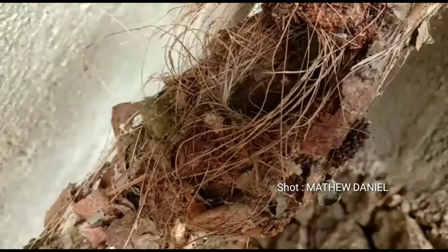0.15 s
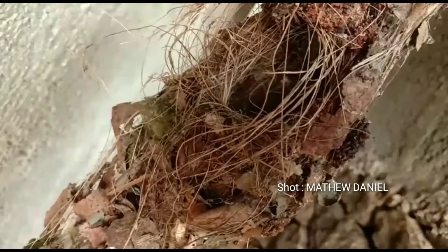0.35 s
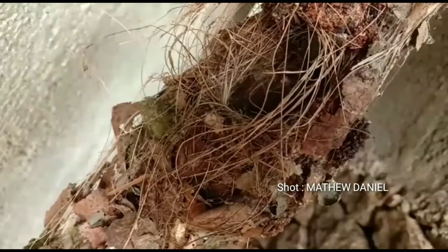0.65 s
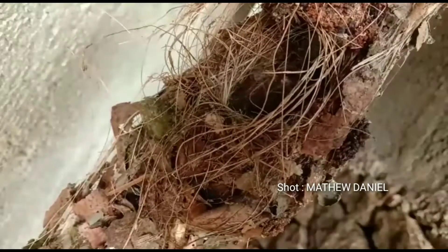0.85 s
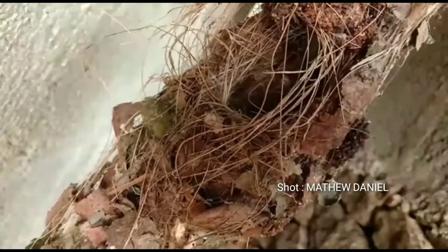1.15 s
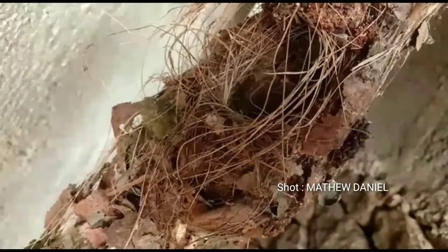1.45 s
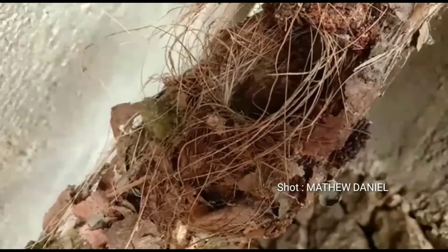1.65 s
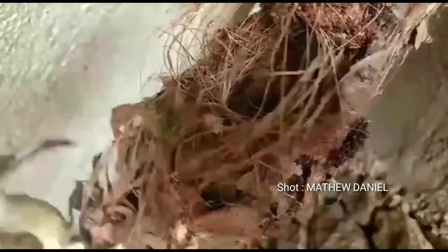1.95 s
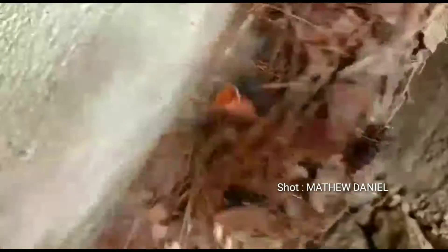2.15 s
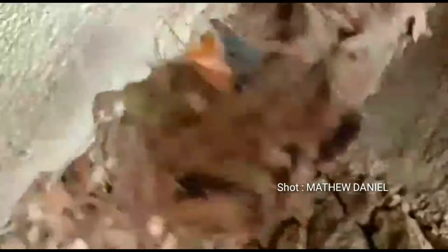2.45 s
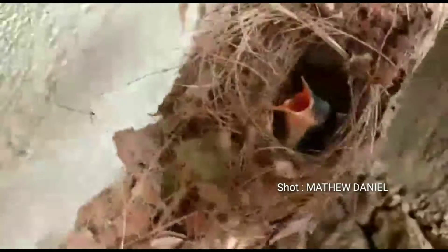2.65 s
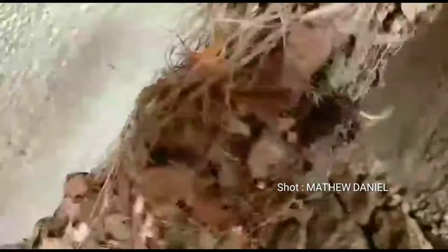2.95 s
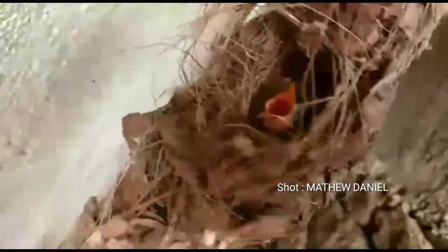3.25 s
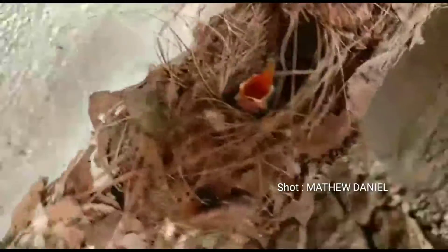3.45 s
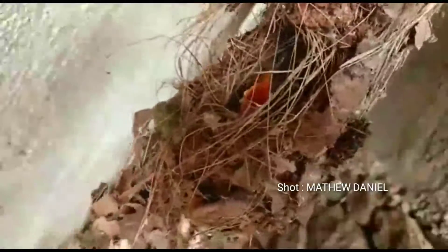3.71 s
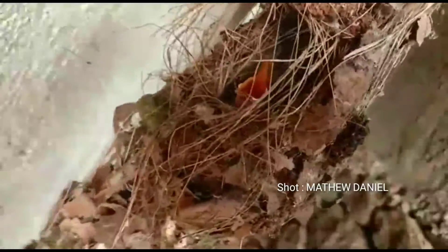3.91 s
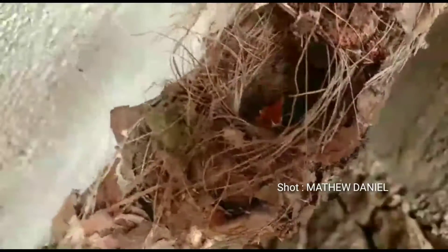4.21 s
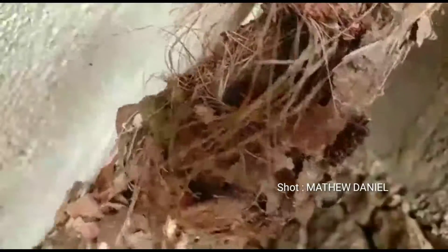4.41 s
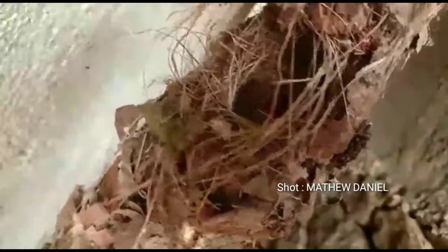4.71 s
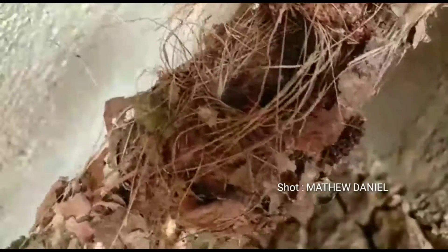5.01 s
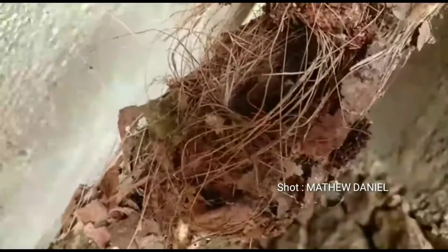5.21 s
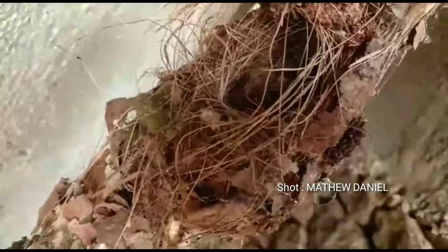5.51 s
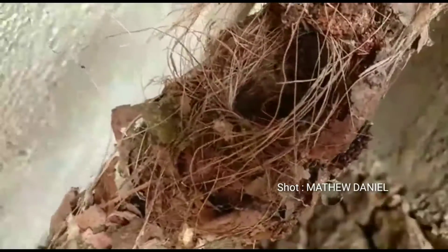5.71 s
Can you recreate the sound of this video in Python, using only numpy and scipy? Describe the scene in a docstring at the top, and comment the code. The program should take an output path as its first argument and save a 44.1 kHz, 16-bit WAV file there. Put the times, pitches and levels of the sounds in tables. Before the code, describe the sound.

A small bird's low fluttering thumps and feathery swishes surround piercing chick peeps, a sharp rasping call, a brief buzz and faraway cawing.

```python
"""Under the eaves, a sunbird flutters about its nest close to the microphone while a chick begs in thin peeps.
Wing beats are smooth puffs with swirling air and grainy feather noise; the peeps are nearly pure gliding tones.
The parent gives one harsh chak, a rising tone mixed with rasp, and a few falling chips with a wall echo.
On the left, small birds whistle, a fast pulse train buzzes and tiny upward slurs make a trill; lisps sound ahead.
Farther off a crow caws twice in a hoarse harmonic voice, amid low calls, faint ticks and quiet coloured-noise air."""
import sys
import numpy as np
from scipy import signal
from scipy.fft import rfft, irfft, next_fast_len
from scipy.io import wavfile

SR = 44100
rng = np.random.default_rng(int(sys.argv[2]) if len(sys.argv) > 2 else 0)


def log_audio(samples):
    """Write samples as a 16-bit WAV file to the path given in sys.argv[1]."""
    # one column per channel
    frames = np.atleast_2d(samples).T
    # limit to full scale, then quantise
    limited = np.clip(frames, -1, 1)
    pcm = np.round(limited * 32767).astype(np.int16)
    wavfile.write(sys.argv[1], SR, pcm)


N = 258867
T = np.arange(N) / SR   # time of every sample, in seconds

# Flurries of wing beats. Each row: start in seconds, length in seconds, thump level in dB,
# level of the swirling air in dB, feather swish in dB (before the swish is lifted as a whole).
FLURRIES = [(0.013, 0.091, -34, -47, -50), (0.11, 0.059, -32, -40.5, -45), (0.181, 0.11, -33, -46.5, -48),
            (.325, 0.049, -32, -37, -49), (0.386, 0.059, -28.5, -47, -47.5), (0.473, .052, -25, -37, -46.5),
            (0.547, .11, -32, -46, -51.5), (0.694, 0.031, -39, -54, -49.5), (0.768, 0.031, -36, -50, -47),
            (0.813, 0.078, -26, -36.5, -45.5), (0.948, 0.059, -28, -43, -47.5), (1.03, 0.2, -44, -55, -53),
            (1.267, 0.061, -42, -58, -49), (1.368, 0.061, -32.5, -41, -47.5),
            (1.489, .064, -32, -48.5, -48.5), (1.632, .045, -30, -39.5, -44),
            (1.692, 0.07, -39, -42.5, -49), (1.767, 0.071, -32, -35, -44.5), (1.89, 0.073, -67, -73, -51),
            (2.15, .146, -30, -30, -38), (2.32, 0.061, -32.5, -46, -53), (4.198, 0.069, -51, -47, -61),
            (4.744, 0.19, -43, -43.5, -51), (5.066, 0.059, -29, -37.5, -48),
            (5.151, 0.066, -44, -55, -50.5), (5.213, 0.076, -31, -42, -48.5),
            (5.318, .18, -34.5, -53, -51.5), (5.513, .1, -34.5, -44, -51.5),
            (5.645, 0.06, -34.5, -41.5, -48.5), (5.769, 0.071, -32.5, -39.5, -48.5)]
# The parent's high falling chips. Each row: start in seconds, level in dB (before flutter and wall echo).
CHIPS = [(4.999, -27), (5.368, -29.5), (5.618, -29.5)]


def from_db(db):
    """Turn decibels into a gain."""
    return 10 ** (np.asarray(db) / 20)


def rms_one(x):
    """Scale a sound to unit power."""
    return x / np.sqrt(np.mean(x ** 2) + 1e-20)


def colour(x, spectrum):
    """Filter a sound by an outline of (Hz, dB) points that falls steeply past its ends."""
    hz, db = np.transpose(spectrum)
    size = next_fast_len(N, real=True)
    f = np.maximum(np.arange(size // 2 + 1) * SR / size, 1)
    outline = from_db(np.interp(np.log(f), np.log(hz), db))
    skirts = 1 / (1 + (hz[0] / f) ** 8) / (1 + (f / hz[-1]) ** 16)
    return irfft(rfft(x, size) * outline * np.sqrt(skirts), size)[:N]


def noise(spectrum):
    """Make coloured noise of unit power."""
    return rms_one(colour(rng.standard_normal(N), spectrum))


def drift(rate):
    """Wander at random between `rate` new values a second, joined by straight lines, with unit power."""
    knots = rng.standard_normal(N // 4)
    return rms_one(np.interp(T * rate, np.arange(len(knots)), knots))


def during(s, length):
    """Pick the samples of an event, and the share of it gone by at each."""
    on = (T > s) & (T < s + length)
    return on, (T[on] - s) / length


def fades(part, length, edge_s):
    """Open and close the gain over a short edge."""
    return np.minimum(1, np.minimum(part, 1 - part) * length / edge_s)


def contour(rows, edge_s=0.0014):
    """Draw the pitch and gain of one call through its points, with short fades at its ends."""
    s, hz, db = np.transpose(rows)
    gate = np.clip(np.minimum(T - s[0], s[-1] - T) / edge_s + .5, 0, 1)
    return np.interp(T, s, hz), gate * from_db(np.interp(T, s, db))


def tone(hz):
    """Make a sine of unit power that follows a pitch."""
    return np.sqrt(2) * np.sin(2 * np.pi * np.cumsum(hz) / SR)


def notes(rows, waver):
    """Whistle short sliding notes that swell and fade, on a slightly unsteady pitch."""
    out, pitch = np.zeros(N), 1 + waver * drift(400)
    for s, length, first_hz, last_hz, db in rows:
        on, part = during(s, length)
        hz = (first_hz + (last_hz - first_hz) * part) * pitch[on]
        out[on] += from_db(db) * np.sqrt(np.sin(np.pi * part)) * tone(hz)
    return out


def pan(x, left_db):
    """Put a source on the left: it reaches the right microphone ten samples later, and weaker."""
    gains = from_db([[left_db / 2], [-left_db / 2]])
    return np.array([x, np.roll(x, 10)]) * gains / np.sqrt(np.mean(gains ** 2))


def echoes(x, t60):
    """Add up diffuse reflections from walls and trees, different at each side, dying 60 dB in t60 seconds."""
    t = np.arange(SR) / SR
    tail = rng.standard_normal((2, SR)) * from_db(-60 * t / t60) * (t > .006)
    tail /= np.sqrt(np.sum(tail ** 2, axis=1, keepdims=True))
    return signal.fftconvolve(x[None], tail, axes=1)[:, :N]


def air(air_db=-53, hiss_db=-70.5, murmur_db=-59.5, stir_db=-59.0, lump_db=9.5):
    """Layer noises: quiet outdoor air, lumpy draughts, a wide far-off wash and the microphone's hiss."""
    # Tone colour of the quiet air. Each row: frequency in Hz, level in dB.
    air_colour = [(13, -35), (22, 6), (59, -7), (140, 0), (211, -23.5), (302, -21.5), (539, -20.5),
                  (585, -14), (750, -39), (1300, -12.5), (1760, -30.5), (6620, -27), (7390, -21.5),
                  (8490, -34), (16000, -43)]
    # Microphone hiss at the very top. Each row: frequency in Hz, level in dB.
    hiss_colour = [(13000, -29), (14500, -6.5), (15300, 1.5), (16000, -7.5)]
    wash = [(30, -2.0), (300, -4), (900, 2), (1300, -4), (2000, -1.5), (6000, -9), (9000, -31.5), (15000, -22.5)]
    wide = from_db(murmur_db) * np.array([noise(wash), noise(wash)])
    lumps = from_db(lump_db * np.tanh(drift(26)))
    draught = from_db(stir_db) * rms_one(noise([(100, -10.0), (350, -17.5)]) * lumps)
    return from_db(air_db) * noise(air_colour) + draught + wide + from_db(hiss_db) * noise(hiss_colour)


def ticks(level_db=-65.):
    """Scatter faint ticks, each ringing briefly at a pitch of its own."""
    ticks_per_s, low_hz, high_hz, cycles, spread_db = 25, 1100, 4500, 10, 14
    out = np.zeros(N)
    for when, pitch, size in rng.random((round(ticks_per_s * N / SR), 3)):
        hz = low_hz * (high_hz / low_hz) ** pitch
        on, part = during(when * N / SR, cycles / hz)
        out[on] += from_db(spread_db * size) * (1 - part) ** 2 * np.sin(2 * np.pi * cycles * part)
    return from_db(level_db) * rms_one(out)


def peeps(waver=.005, onset_rough=.018, rough_s=.025, flutter_db=3.5, edge_s=0.00179):
    """Make nearly pure tones that flick up, dip and settle as they fade; pitch is roughest at the start."""
    # The chick's peeps. Each row: start in seconds, length in seconds, opening in seconds, dip pitch in Hz,
    # held pitch in Hz, level in dB (before fade and flutter), fade in dB, closing push in dB.
    peep_rows = [(0, 0.23, .01, 6880, 6800, -38, 12.5, -2), (1.319, .178, .046, 6850, 7380, -37, 10, 0.5),
                 (2.072, 0.21, 0.059, 7000, 7430, -34, 8.5, -2.5),
                 (2.972, 0.26, 0.0605, 7130, 7470, -32, 17, -4.5),
                 (4, .285, 0.064, 7380, 7600, -42.5, 23.5, 22),
                 (4.951, 0.22, 0.1, 7150, 8320, -42.5, 16.5, 5)]
    # The opening flick up and back. Each row: share of the opening, pitch as a ratio, level in dB.
    opening_rows = [(0, .85, -7), (.09, 1.02, -5), (.26, 1.12, -6), (.52, 1.04, -3), (1, 1, 0)]
    # The other side of the voice organ sweeps upward at the end of some peeps.
    # Each row: start in seconds, level in dB (before fade and flutter).
    upsweep_rows = [(3.089, -45.5), (4.09, -56), (5.06, -51)]
    settle_s = .055
    push_s, push_hz_per_db = 0.018, 24   # a closing push shifts pitch along with loudness
    upsweep_s, upsweep_from_hz, upsweep_to_hz, upsweep_fade_db = 0.11, 7700, 9500, 16.5
    shares, ratios, levels_db = np.transpose(opening_rows)
    out, wobble = np.zeros(N), drift(600)
    for s, length, opening_s, dip_hz, held_hz, db, fade_db, push_db in peep_rows:
        on, part = during(s, length)
        t = part * length
        push = push_db * np.exp((t - length) / push_s)
        hz = held_hz + (dip_hz - held_hz) * np.exp(-np.maximum(t - opening_s, 0) / settle_s)
        hz = hz * np.interp(t / opening_s, shares, ratios) + push_hz_per_db * push
        loudness_db = db + np.interp(t / opening_s, shares, levels_db) - fade_db * part + push
        gain = from_db(loudness_db) * fades(part, length, edge_s)
        unsteady = waver + onset_rough * np.exp(-(t / rough_s) ** 2)
        out[on] += gain * tone(hz * (1 + unsteady * wobble[on]))
    for s, db in upsweep_rows:
        on, part = during(s, upsweep_s)
        hz = upsweep_from_hz + (upsweep_to_hz - upsweep_from_hz) * part ** 1.5
        gain = from_db(db - upsweep_fade_db * part) * fades(part, upsweep_s, edge_s)
        out[on] += gain * tone(hz * (1 + waver * wobble[on]))
    return out * from_db(flutter_db * drift(110))


def wings(uneven_db=2.2, swell_db=1.5):
    """Push a smooth puff of air at the microphone on each beat, with a swirl on top; flurries gain force."""
    wingbeat_hz, thump_hz, thump_width_s = 25, 83.3, 0.01
    thump, push = np.zeros((2, N))
    for start, length, puff_db, swirl_db, _ in FLURRIES:
        beats = max(1, round(length * wingbeat_hz))
        for part in (np.arange(beats) + .5) / beats:
            middle = start + part * length
            on, _ = during(middle - .05, .1)
            t = T[on] - middle
            force_db = swell_db * (part - 1.0) + uneven_db * rng.standard_normal()
            puff = from_db(force_db) * np.exp(-.5 * (t / thump_width_s) ** 2)
            thump[on] += from_db(puff_db) * puff * np.cos(2 * np.pi * thump_hz * t)
            push[on] += from_db(swirl_db) * puff
    swirl = noise([(30, -3.5), (90, 1.5), (135, 9.5), (190, 1), (320, -7), (600, -14), (1300, -22.5)])
    return thump + push * swirl


def feathers(level_db=1.0, grain_db=-0.5, surge_db=3.5, release_s=0.0079, sag_db=2.0, crackle_db=-8.5):
    """Swish in grainy noise that starts sharply and sags; each half octave surges on its own."""
    # Tone colour of the swish. Each row: frequency in Hz, level in dB.
    swish_colour = [(150, -18.5), (250, -7.5), (761, -18.5), (1240, -4.5), (1380, -12.5), (1850, -8.5),
                    (2490, -14), (6040, -11.5), (6590, -16), (7310, -6), (9010, -27.5), (13400, -34),
                    (14900, -18), (16000, -26.5)]
    attack_s, patchy_db, snaps_per_s = .006, 3.8, 90
    push = np.zeros(N)
    for s, length, _, _, db in FLURRIES:
        on, _ = during(s, length + release_s)
        t = T[on] - s
        edges = np.minimum(1, np.minimum(t / attack_s, (length + release_s - t) / release_s))
        push[on] += from_db(db - sag_db * t / length) * edges
    swish, below, patchy = noise(swish_colour), 0, 0
    for hz in 350 * 2 ** np.arange(0, 5.6, .5):
        low = signal.sosfiltfilt(signal.butter(4, hz, fs=SR, output="sos"), swish)
        band = low - below
        patchy = patchy + band * from_db(patchy_db * drift(80))
        below = low
    grainy = rms_one(patchy * from_db(grain_db * drift(500) + surge_db * drift(60)))
    # single dry fibres flick back
    snaps = (rng.random(N) < snaps_per_s / SR) * rng.standard_normal(N)
    crackle = from_db(crackle_db) * rms_one(colour(snaps, swish_colour))
    return from_db(level_db) * push * (grainy + crackle)


def series(count=6):
    """Repeat one faint rising whistle at an even pace."""
    # The whistle: length in seconds, first pitch in Hz, last pitch in Hz, level in dB.
    whistle = (.05, 3800, 4550, -53)
    start_s, period_s = .79, .168
    return notes([(start_s + k * period_s, *whistle) for k in range(count)], waver=.01)


def chak(rough=0.084, rasp_db=1.5):
    """Blow a hard rising note whose second harmonic dominates, broken up by rasp."""
    # Course of the harsh call. Each row: time in seconds, pitch of the first harmonic in Hz,
    # level in dB (shared by voice and rasp before the rasp's own lift).
    chak_rows = [(2.28, 1805, -26.5), (2.285, 2258, -24), (2.292, 2719, -8.5), (2.295, 2934, -17.5),
                 (2.301, 3080, -15.5), (2.308, 3260, -21), (2.316, 3270, -28.5), (2.335, 3240, -57.5)]
    # Tone colour of the rasp. Each row: frequency in Hz, level in dB.
    rasp_colour = [(1060, -92.5), (1800, -50), (3230, -12.5), (4220, -17.5), (4860, -26), (5360, -5),
                   (6400, -2), (7990, -22), (8350, -31.5), (9050, -27.5), (10800, -43.5), (13600, -41),
                   (15000, -24)]
    hz, gain = contour(chak_rows)
    hz = hz * (1 + rough * drift(900))
    voice = tone(2 * hz) + from_db(-22) * tone(hz) + from_db(-35) * tone(3 * hz)
    return gain * (voice + from_db(rasp_db) * noise(rasp_colour))


def far_calls():
    """Give low, hoarse calls from far away: short sliding tones on a shaky pitch."""
    # Each row: start in seconds, length in seconds, first pitch in Hz, last pitch in Hz, level in dB.
    call_rows = [(2.54, 0.023, 1095, 972, -54), (2.585, 0.02, 1266, 1420, -50),
                 (3.277, 0.096, 1320, 1210, -51), (3.403, 0.013, 1305, 1494, -45),
                 (4.62, 0.14, 1405, 1258, -49.5), (5.0, 0.087, 1417, 1290, -51),
                 (5.315, .035, 1248, 1307, -49), (5.514, 0.021, 2350, 1256, -43.5),
                 (5.762, 0.02, 2260, 1720, -48)]
    return notes(call_rows, waver=0.032)


def whistles():
    """Whistle the short sliding notes of small birds, and one quick upward flick from the parent."""
    # Each row: start in seconds, length in seconds, first pitch in Hz, last pitch in Hz, level in dB.
    whistle_rows = [(3.415, 0.18, 3400, 3430, -41.5), (3.756, 0.068, 3650, 4350, -49.5),
                    (3.911, .048, 3600, 4360, -49.5), (3.93, 0.14, 3390, 3330, -46),
                    (3.93, 0.14, 5030, 5120, -58.5), (5.821, 0.0072, 4900, 6800, -37)]
    return notes(whistle_rows, waver=0.011)


def lisps():
    """Slide high notes downward on a very unsteady pitch, so that they lisp."""
    # Each row: start in seconds, length in seconds, first pitch in Hz, last pitch in Hz, level in dB.
    lisp_rows = [(3.487, 0.05, 6200, 5610, -44.5), (3.625, .048, 6600, 5520, -44)]
    return notes(lisp_rows, waver=0.036)


def chips(waver=0.0052, flutter_db=-0.2, slur_skew=0.64):
    """Whistle falling notes; the wall's echo nearly cancels each chip for a moment, splitting it in two."""
    # The parent's lower, longer slurs. Each row: start in seconds, length in seconds,
    # first pitch in Hz, last pitch in Hz, level in dB (before flutter and wall echo).
    slur_rows = [(3.608, .066, 3630, 2384, -34), (4.096, 0.066, 3560, 2360, -34.5)]
    chip_s, from_hz, to_hz = .039, 4720, 3350
    bend, skew, swell = 2.3, 1.5, 1.8   # the fall steepens, and the loudness peaks late in it
    wall_echo_s, wall_echo_db = .00084, -1.5   # the wall beside the nest returns the calls
    out, pitch = np.zeros(N), 1 + waver * drift(800)
    for s, db in CHIPS:
        on, part = during(s, chip_s)
        hz = from_hz + (to_hz - from_hz) * part ** bend
        out[on] += from_db(db) * np.sin(np.pi * part ** skew) ** swell * tone(hz * pitch[on])
    for s, length, first_hz, last_hz, db in slur_rows:
        on, part = during(s, length)
        hz = first_hz + (last_hz - first_hz) * part
        out[on] += from_db(db) * np.sin(np.pi * part ** slur_skew) * tone(hz * pitch[on])
    out = out * from_db(flutter_db * drift(110))
    return out + from_db(wall_echo_db) * np.interp(T - wall_echo_s, T, out)


def crow(edge_s=0.048, flutter_db=1.85):
    """Caw in a hoarse, jittering harmonic voice with rasp on an arched pitch, shaped by the throat."""
    # The caws. Each row: start in seconds, length in seconds, top pitch in Hz,
    # level in dB (of voice and of rasp before its own cut; flutter comes on top).
    caw_rows = [(3.962, .245, 642.4, -44), (4.331, .225, 664, -41.5)]
    # Tone colour of the throat. Each row: frequency in Hz, level in dB.
    throat = [(400, -21), (620, -9.5), (850, -23), (1100, -9.5), (1320, 6), (1650, 3), (1950, -9.5),
              (2400, -22), (4000, -9)]
    crest, droop = 0.31, 0.39   # pitch crests at this share of a caw and droops to either side
    rough, rasp_db = .03, -4
    out, jitter, rasp = np.zeros(N), 1 + rough * drift(350), from_db(rasp_db) * noise(throat)
    for s, length, top_hz, db in caw_rows:
        on, part = during(s, length)
        arch = 1 - droop * (np.clip((T - s) / length, 0, 1) - crest) ** 2
        hz = top_hz * arch * jitter
        voice = colour(sum(tone(k * hz) for k in range(1, 5)), throat)
        gain = from_db(db) * np.sqrt(fades(part, length, edge_s))
        out[on] += gain * (rms_one(voice[on]) + rasp[on])
    return out * from_db(flutter_db * drift(70))


def buzz(first_hz=129, last_hz=112, jitter=0.0088, rough=0.82, trough=0.66, uneven_db=-1.5, rasp_db=-2.0):
    """Run a fast train of short notes on the throat's resonances, slowing as it goes."""
    # Loudness of the buzz. Each row: time in seconds, level in dB.
    level_rows = [(4.205, -45), (4.25, -38), (4.3, -39), (4.36, -43), (4.6, -45.5), (4.921, -45)]
    # Throat tones of the buzz. Each row: frequency in Hz, relative level in dB.
    throat_tones = [(3950, 0), (4400, -2), (4900, -10.5), (5500, -17)]
    s, db = np.transpose(level_rows)
    rate = np.interp(T, [s[0], s[-1]], [first_hz, last_hz])
    part = np.cumsum(rate * (1 + jitter * drift(100))) / SR % 1   # share of the current pulse gone by
    # every pulse starts its tones afresh, so the spectrum is a comb at the pulse rate
    voice = from_db(rasp_db) * rng.standard_normal(N)
    for hz, tone_db in throat_tones:
        voice += from_db(tone_db) * np.sin(2 * np.pi * hz * part / rate + rough * drift(400))
    voice = voice * (trough + np.sin(np.pi * part) ** 2) * from_db(uneven_db * drift(130))
    voice = signal.sosfilt(signal.butter(3, [3650, 6000], "band", fs=SR, output="sos"), voice)
    gate = np.clip(np.minimum(T - s[0], s[-1] - T) / 0.01, 0, 1)
    return from_db(np.interp(T, s, db)) * gate * rms_one(voice)


def graces():
    """Slide tiny notes into and out of every chip."""
    # Each row: time after the chip's start in seconds, length in seconds, first pitch in Hz,
    # last pitch in Hz, level in dB relative to the chip's.
    grace_rows = [(-.036, 0.018, 6970, 6750, -14.5), (0.038, 0.0056, 4560, 6140, -14.5)]
    rows = [(s + after_s, length, first_hz, last_hz, db + above_db)
            for s, db in CHIPS for after_s, length, first_hz, last_hz, above_db in grace_rows]
    return notes(rows, waver=0.0095)


def trill(rate_hz=51, sweep=0.22):
    """Run through tiny upward slurs, each swelling and fading."""
    # Course of the trill. Each row: time in seconds, middle pitch of a slur in Hz, level in dB.
    trill_rows = [(5.078, 2720, -44), (5.125, 2506, -44.5), (5.2, 2414, -41.5), (5.27, 2417, -43.5)]
    hz, gain = contour(trill_rows)
    part = (T - trill_rows[0][0]) * rate_hz % 1   # share of the current slur gone by
    return gain * np.sin(np.pi * part) * tone(hz * (1 + sweep * (part - .5)))


def scene():
    """Keep the nest close and dry; give other birds more echo the farther they are."""
    close = peeps() + wings() + feathers() + chak()
    near = chips() + buzz() + trill()
    around = series() + whistles() + graces()
    ahead = lisps()
    far = far_calls() + crow()
    left = pan(near, left_db=14.5) + from_db(-10) * echoes(near, t60=0.35)
    left = left + pan(around, left_db=11.0) + from_db(-6.5) * echoes(around, t60=0.65)
    centre = ahead + from_db(-2.5) * echoes(ahead, t60=0.68)[0]   # the same echo at both sides
    distance = far + from_db(-4.5) * echoes(far, t60=1.0)
    return close + left + centre + distance + pan(ticks(), left_db=9) + air()


def record(dry):
    """Round off the loudest peaks and cut the top above 15800 Hz."""
    return signal.sosfilt(signal.ellip(10, .1, 90, 15800, fs=SR, output="sos"), np.tanh(dry))


dry = scene()
out = record(dry)
log_audio(out)
```